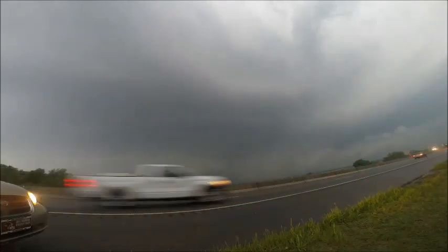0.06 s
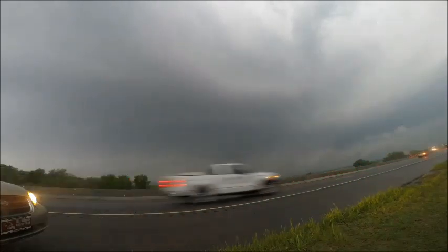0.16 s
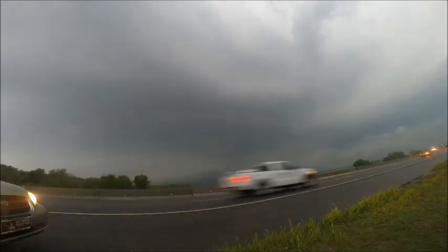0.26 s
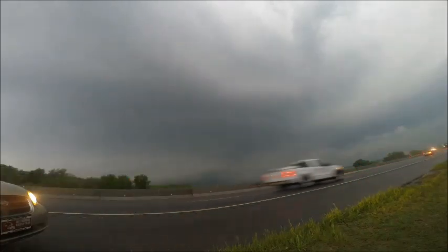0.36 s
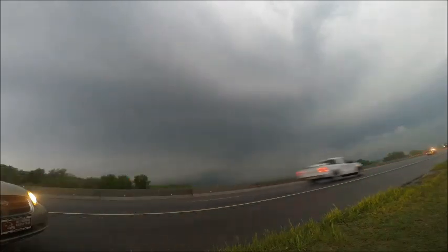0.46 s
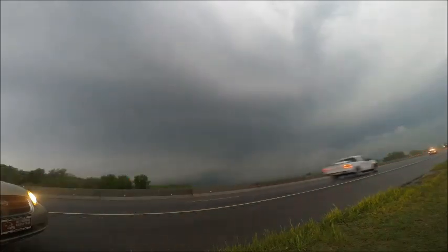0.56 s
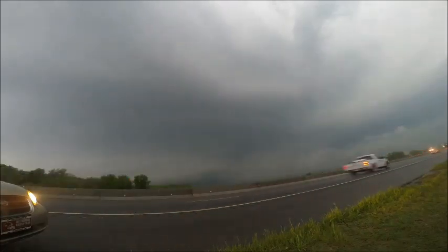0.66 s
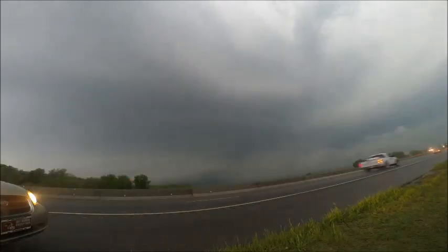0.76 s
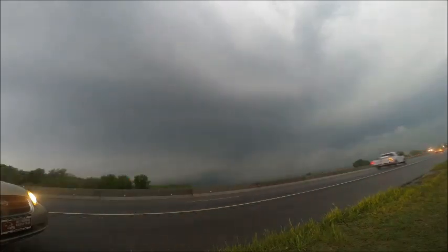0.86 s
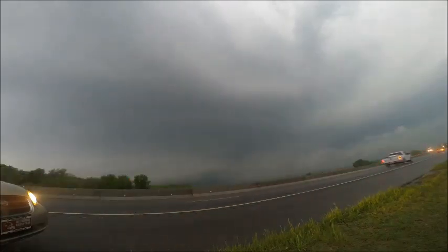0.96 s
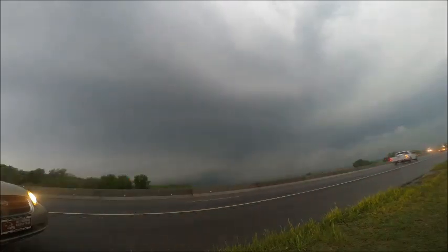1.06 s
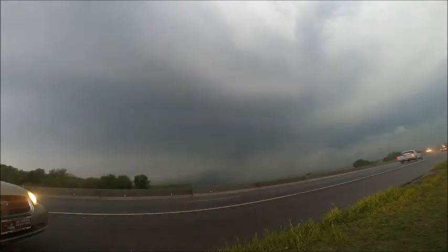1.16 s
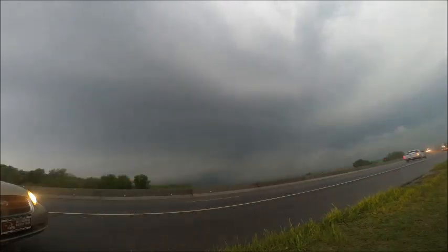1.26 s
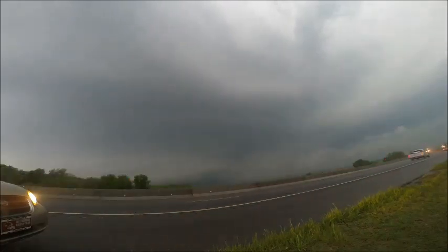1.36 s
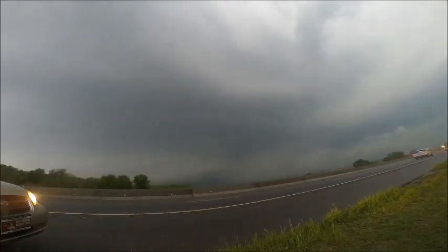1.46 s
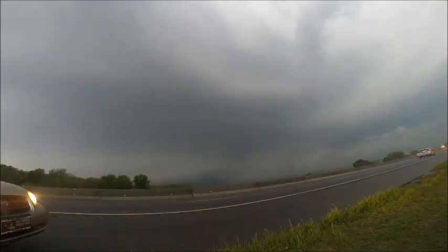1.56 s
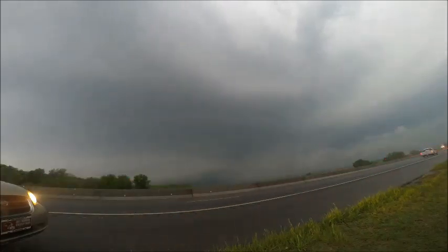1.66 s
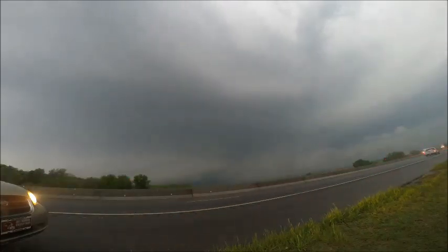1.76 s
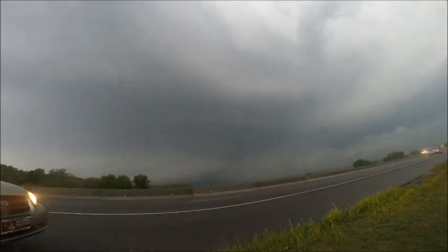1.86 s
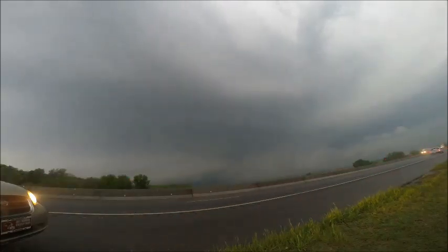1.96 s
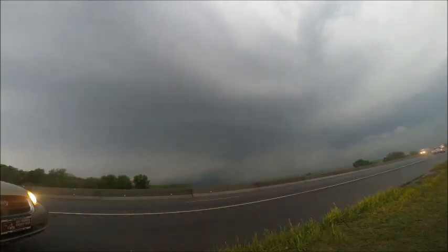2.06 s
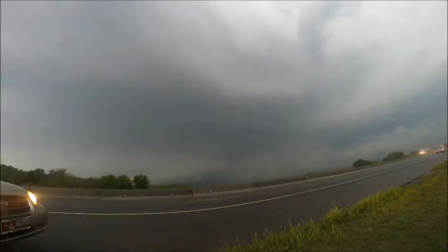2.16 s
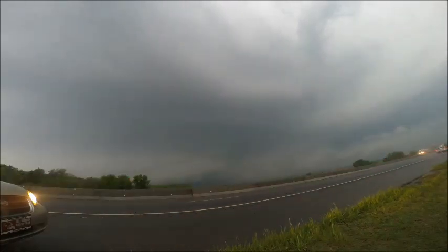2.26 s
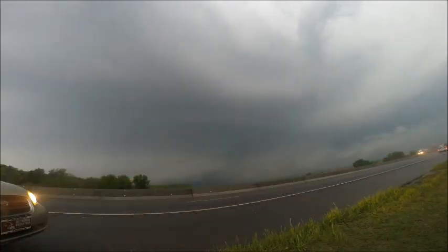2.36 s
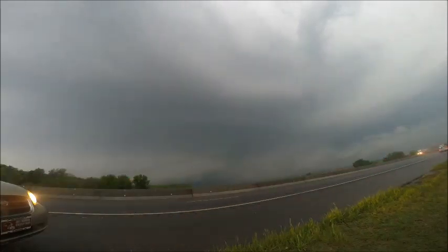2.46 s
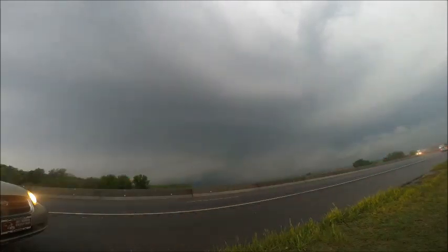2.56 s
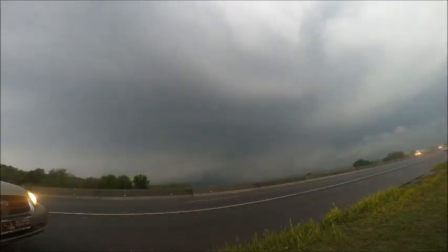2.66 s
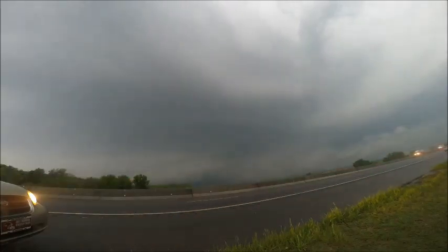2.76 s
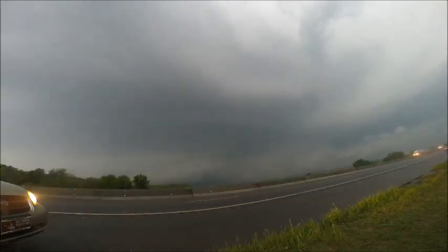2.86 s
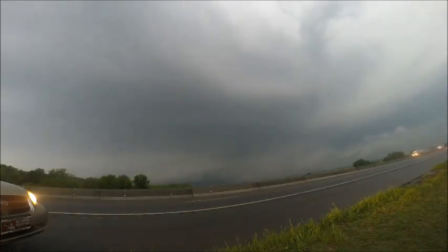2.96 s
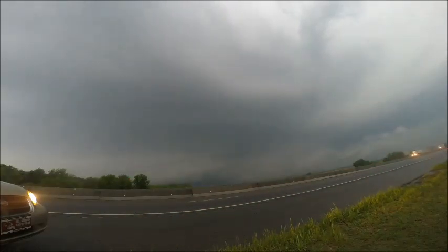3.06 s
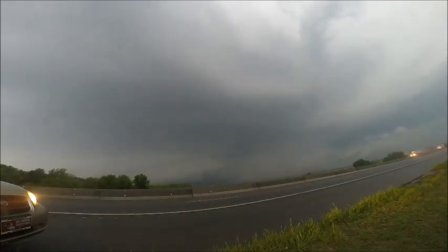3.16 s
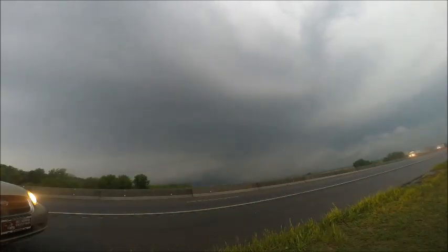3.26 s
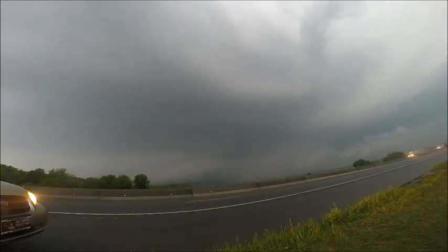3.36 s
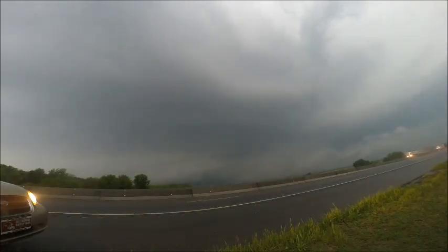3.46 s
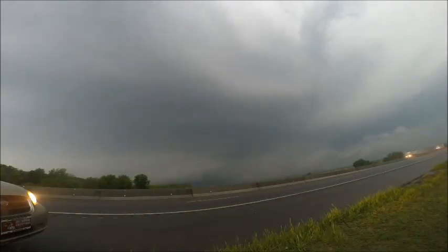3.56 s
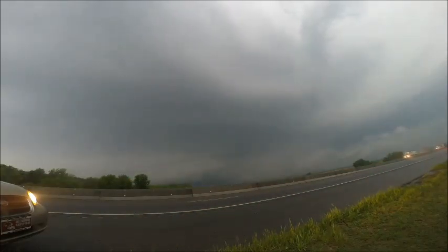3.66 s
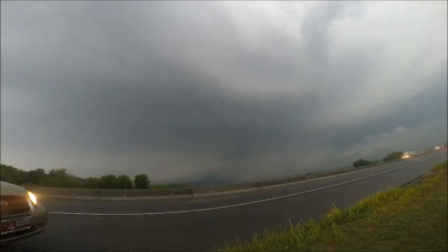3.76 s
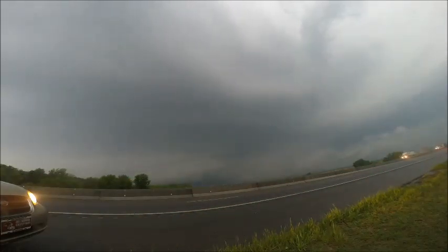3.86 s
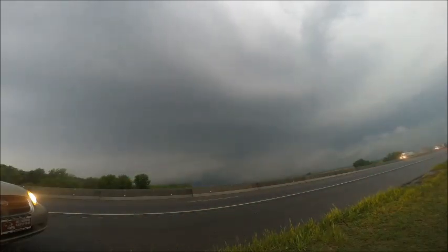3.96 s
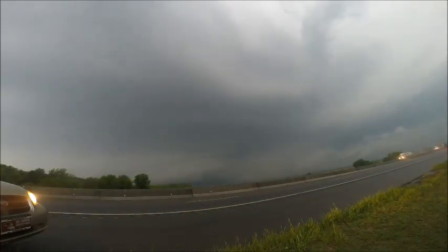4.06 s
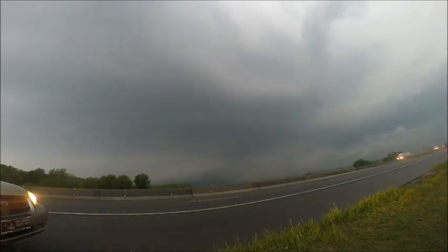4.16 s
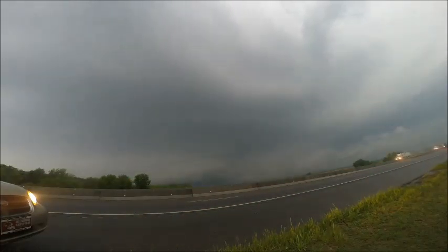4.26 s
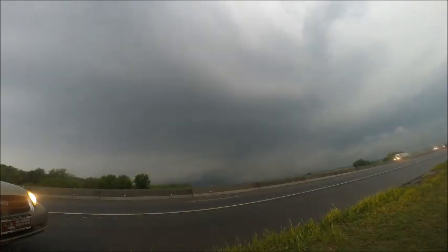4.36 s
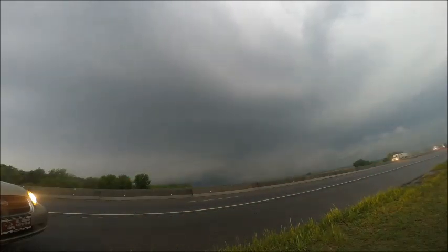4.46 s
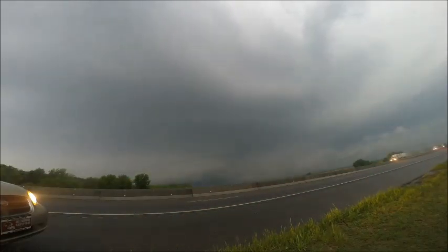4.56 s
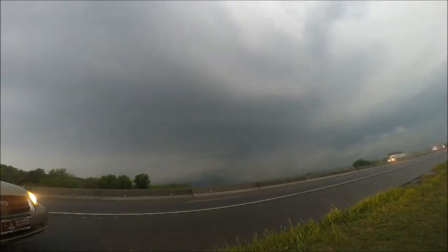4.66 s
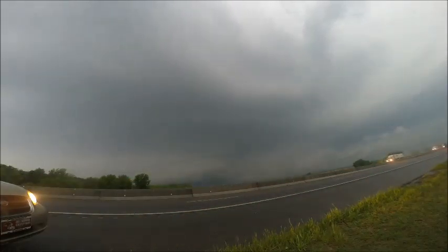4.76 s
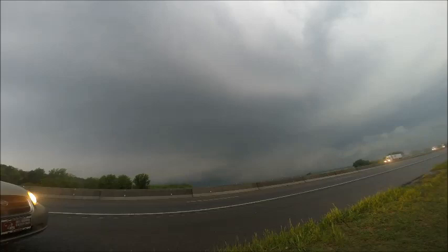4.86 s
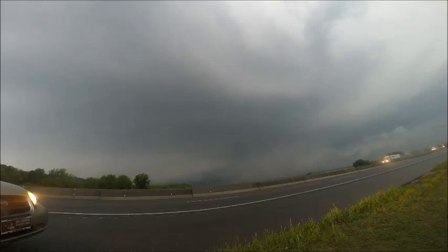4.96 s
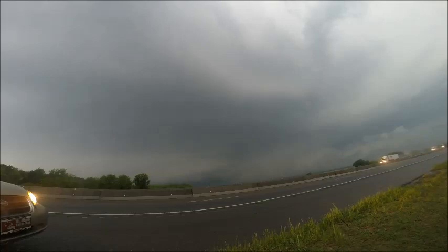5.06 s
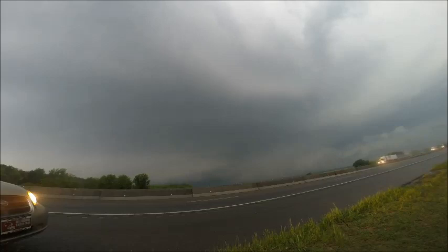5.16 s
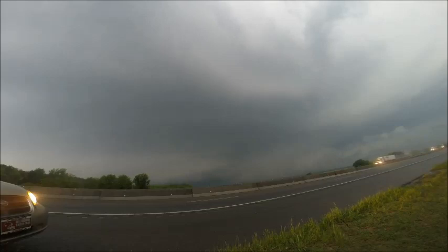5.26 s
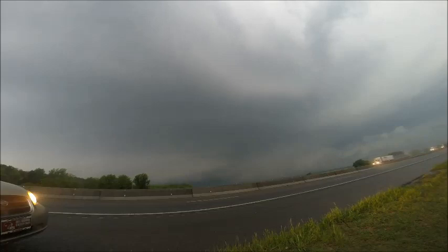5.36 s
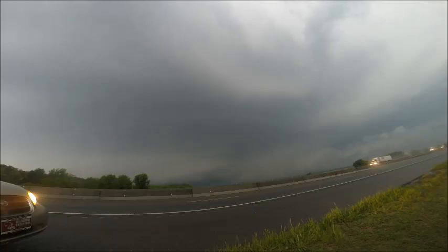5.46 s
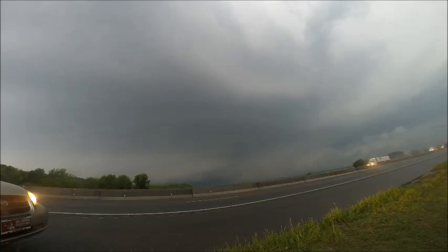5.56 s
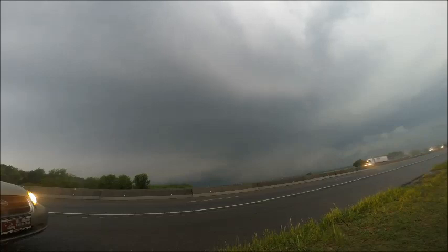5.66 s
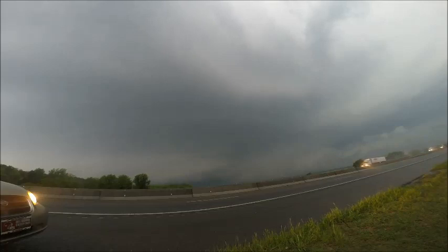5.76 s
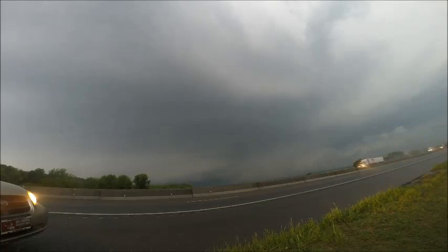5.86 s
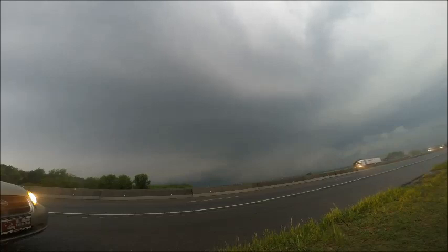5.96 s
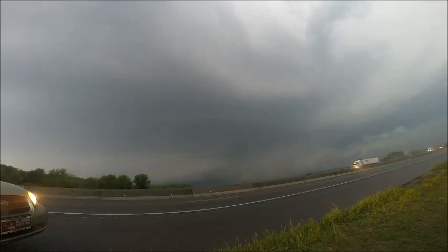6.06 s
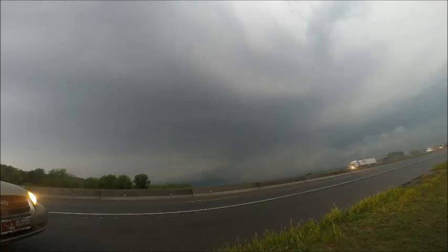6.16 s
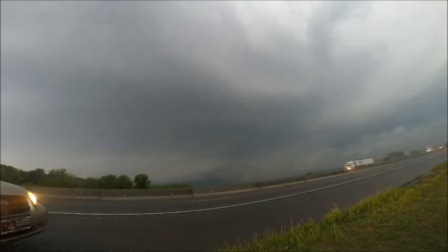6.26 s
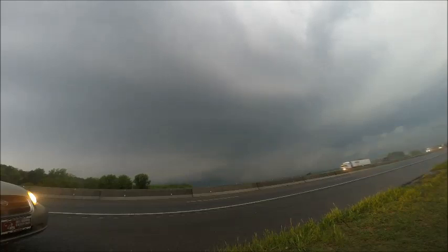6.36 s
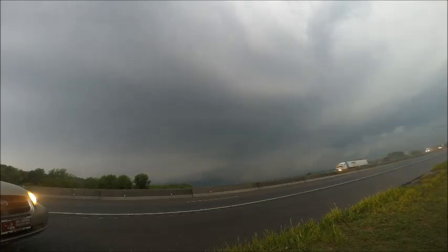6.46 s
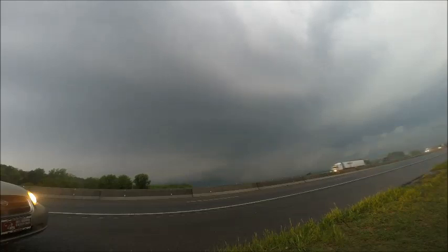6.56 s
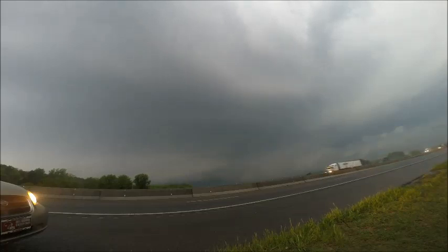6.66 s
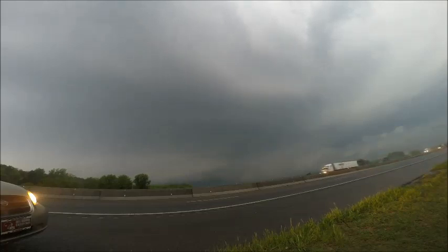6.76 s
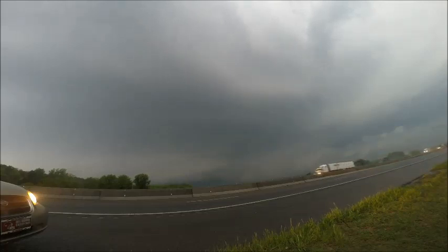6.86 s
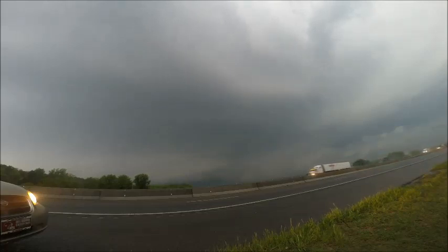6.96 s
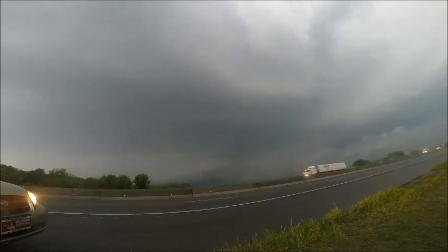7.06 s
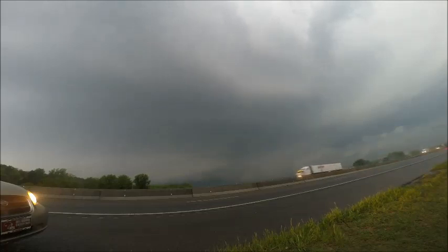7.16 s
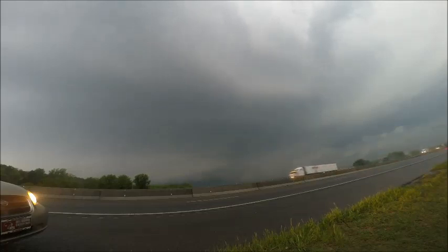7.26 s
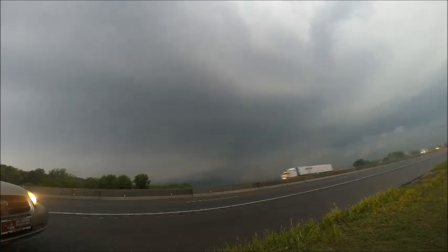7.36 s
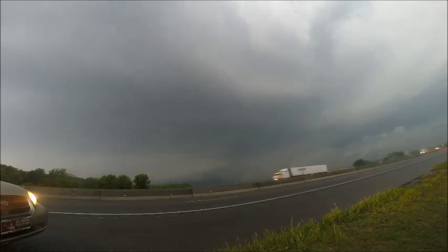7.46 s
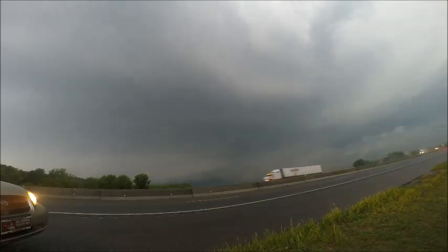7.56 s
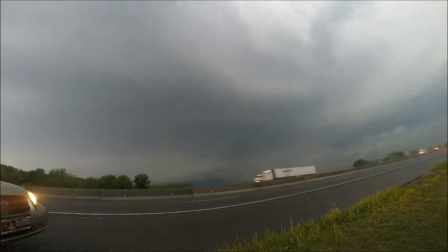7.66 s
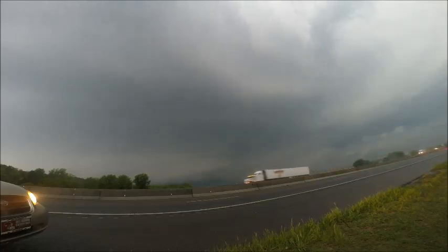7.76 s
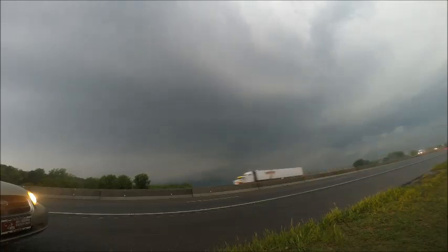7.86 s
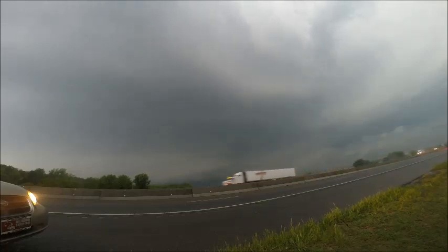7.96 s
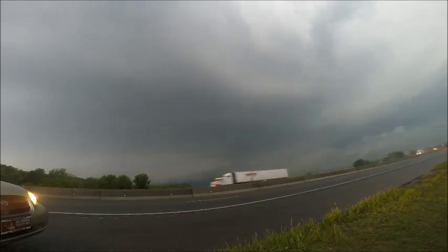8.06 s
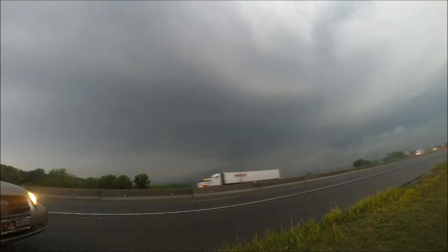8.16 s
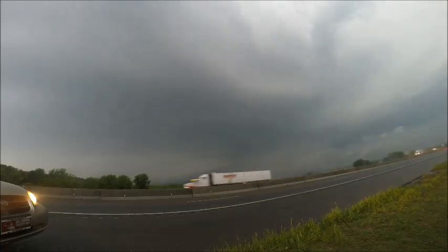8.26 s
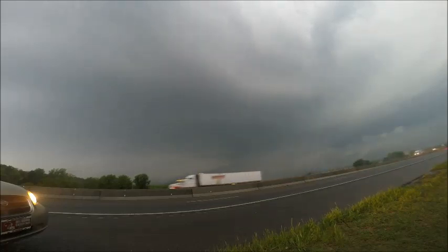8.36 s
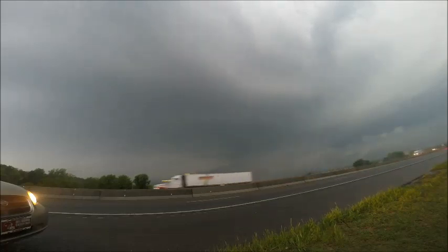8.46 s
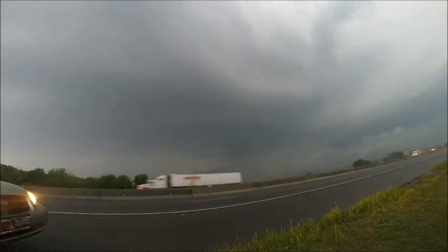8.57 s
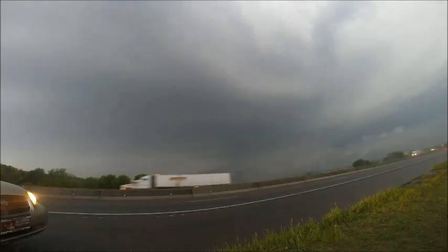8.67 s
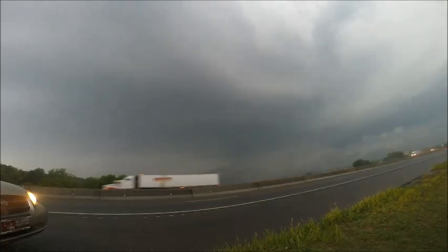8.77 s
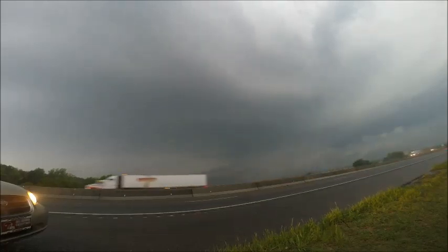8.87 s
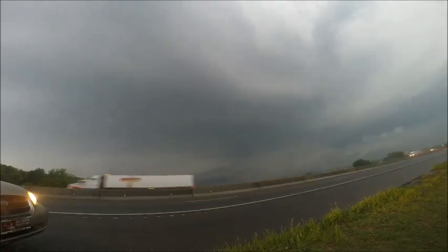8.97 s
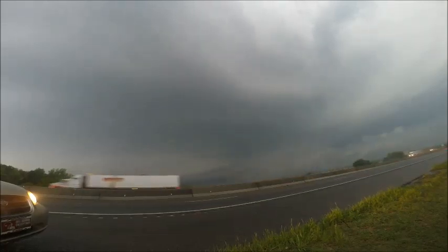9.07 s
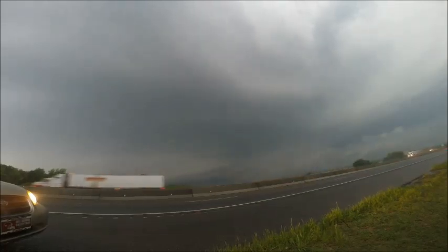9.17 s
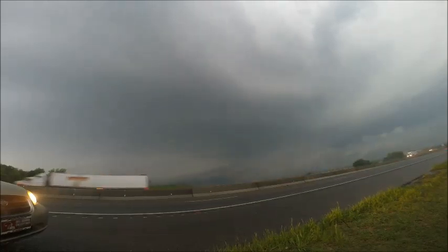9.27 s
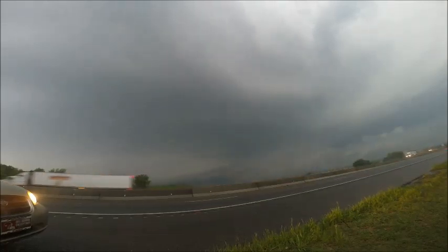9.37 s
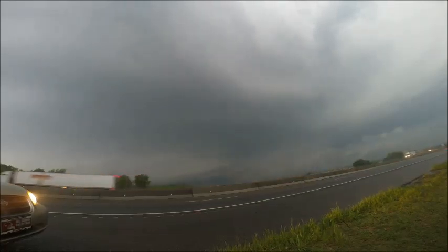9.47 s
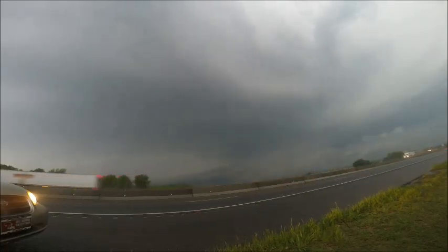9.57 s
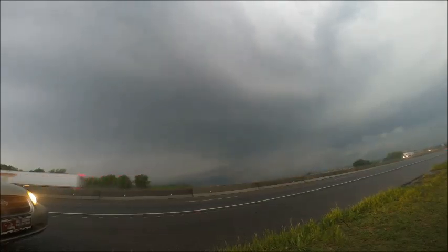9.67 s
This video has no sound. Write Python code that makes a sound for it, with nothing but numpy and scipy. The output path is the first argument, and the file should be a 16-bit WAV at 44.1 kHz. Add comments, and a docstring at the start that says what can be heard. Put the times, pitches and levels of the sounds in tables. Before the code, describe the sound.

Low wind buffeting runs under the sound of a highway, heard through a microphone in a plastic case. A pickup whooshes by at the start and fades into far traffic, with the faint high whirr of an idling car. A lorry's tyres whine softly for a couple of seconds. Toward the end the gusts strengthen and scattered raindrops knock on the case, finishing with one loud, sharp hit.

```python
"""A highway verge ahead of a storm, on the microphone of a camera in a plastic housing.
At once a pickup rushes past about 9 m away and recedes, leaving the tyre roar of far traffic and the
whirr of a parked car idling. Wind shakes the camera on its mount throughout. From 5 to 7 s a lorry
nears on the far side with a short tyre whine. Then the wind rises and hard taps, likely the first
raindrops, gather on the housing; the loudest, near 9 s, ducks the gain."""
import sys
import numpy as np
from scipy import signal
from scipy.fft import rfft, irfft, next_fast_len
from scipy.io import wavfile
from scipy.ndimage import uniform_filter1d

SR = 44100
rng = np.random.default_rng(int(sys.argv[2]) if len(sys.argv) > 2 else 0)


def generate_wav(signal):
    """Clip the signal to [-1, 1] and save it as 16-bit WAV at the path in sys.argv[1]."""
    frames = np.transpose(np.atleast_2d(signal))
    scaled = np.clip(frames, -1, 1) * 32767
    pcm = np.round(scaled).astype(np.int16)
    wavfile.write(sys.argv[1], SR, pcm)


N = 429093
TIME = np.arange(N) / SR
CUTOFF_HZ = 15100   # top of the camera's range


def pickup(peak_db, loudest_m, width_lanes, falloff):
    """Power of one part of the pickup's tyre noise as its beam sweeps the verge; falloff 1 is spherical."""
    abreast_s, speed_m_per_s, lane_m, flutter_hz = 0.1594, 33.88, 8.71, 7.1
    along_m = speed_m_per_s * (TIME - abreast_s) - loudest_m
    spreading = (1 + (along_m / (width_lanes * lane_m)) ** 2) ** falloff
    screened_db = 2.5 * np.exp(-TIME / 0.073)   # it comes clear of the parked car
    flutter_db = noise([(flutter_hz / 2, 0), (flutter_hz, 0), (2 * flutter_hz, -14)])   # turbulent wake
    return from_db(peak_db - screened_db + flutter_db) ** 2 / spreading


# Distant vehicles: loudest t/s, half-length/s, relative level/dB of roar, of tread, of hiss
FAR_PASSES = [(1.22, 0.305, -53.5, -55.5, -59.5), (1.95, 0.504, -54.5, -54.5, -63.5),
              (2.949, 0.516, -50.5, -53.5, -82), (4.702, 0.32, -60.5, -55, -87),
              (5.495, 0.8, -61.5, -50.5, -69.5), (6.604, 0.35, -58.5, -53.5, -60.5),
              (9.455, 0.12, -72.5, -58, -70)]
def far_traffic():
    """Power of roar, tread and hiss far down the road: vehicles swell out of a steady stream."""
    powers = []
    for part, stream_db in enumerate((-58, -57.5, -65)):
        passes = sum(swell(s, half_s, parts_db[part]) for s, half_s, *parts_db in FAR_PASSES)
        powers.append(from_db(stream_db) ** 2 + passes)
    return powers


# Spectra of the three parts of tyre noise: f/Hz, level/dB
ROAR_SPECTRUM = [(150, -9.5), (300, -13), (450, -9.5), (620, -2), (800, -4), (1100, -.5), (1500, -11),
                 (2500, -33)]
TREAD_SPECTRUM = [(700, -15), (1100, -2), (1400, 1), (1800, 0), (2300, -5.5), (2900, -12.5), (3600, -19.5),
                  (5000, -41)]
HISS_SPECTRUM = [(2200, -1), (3400, -1), (4500, -1), (6000, 0.5), (7500, -9.5), (10000, -14.5),
                 (12000, -24), (15000, -31)]
def tyres():
    """Near and far, tyres roar low, their tread sings, and air squeezed from the grooves hisses."""
    near_roar = pickup(peak_db=-36, loudest_m=-1.69, width_lanes=0.7563, falloff=1.01)
    near_tread = pickup(peak_db=-38, loudest_m=8, width_lanes=1.4045, falloff=0.74)
    near_hiss = pickup(peak_db=-40.5, loudest_m=6.5, width_lanes=3.0, falloff=5.5)
    far_roar, far_tread, far_hiss = far_traffic()
    roar = from_db(-2.0) * np.sqrt(near_roar + far_roar) * noise(ROAR_SPECTRUM)
    tread = from_db(-3.5) * np.sqrt(near_tread + far_tread) * noise(TREAD_SPECTRUM)
    hiss = from_db(-1.49) * np.sqrt(near_hiss + far_hiss) * noise(HISS_SPECTRUM)
    return roar + tread + hiss


# The pickup as seen from the microphone: t/s, bearing (0 abreast, 1 oblique, 2 receding, 3 far)
PICKUP_BEARING = [(.24, 0), (.38, 0.5), (.5, 1.5), (.66, 1.5), (.9, 3), (1.25, 3)]
# Colour of the reflections at each bearing: f/Hz, width/Hz, level/dB
ABREAST_BANDS = [(232, 226, 6), (832, 236, 4), (1076, 212, -3.5), (1790, 174, -8.5), (1973, 132, 10),
                 (2262, 270, -9.5), (2767, 530, 9.5), (3250, 260, -4.5), (4000, 420, -1.5),
                 (5340, 425, -8.5), (6144, 326, 9.5), (6520, 210, -10), (8200, 490, -8.5)]
OBLIQUE_BANDS = [(451, 185, 5), (780, 114, 5), (995, 132, 4.5), (1342.7, 44, 12), (1590, 240, 1.5),
                 (2130, 210, 2.5), (2900, 200, 1), (3300, 280, -5.5), (4735, 164, 6.5), (5040, 376, -5.5),
                 (5860, 250, 1.5), (7430, 860, 4)]
RECEDING_BANDS = [(755, 109, 7), (1340, 78, 1.5), (1700, 520, -3), (2280, 590, 6), (3320, 276, -10),
                  (3670, 67, -6.5), (5380, 630, 3), (6000, 220, -4), (13500, 2000, -3.5)]
FAR_BANDS = [(1072, 335, 0.5), (2800, 370, -6.5), (8380, 3900, -3.5)]
def reflections(x):
    """Reflections off road and housing glide from colour to colour as the pickup swings past."""
    bearing, = in_time(PICKUP_BEARING)
    out = np.zeros(N)
    for k, bands in enumerate((ABREAST_BANDS, OBLIQUE_BANDS, RECEDING_BANDS, FAR_BANDS)):
        share = np.maximum(1 - np.abs(bearing - k), 0)
        out += share * coloured(x, bands)
    return out


# Drops on the housing: t/s, tap level/dB, ring re tap/dB, thump level/dB, top f/Hz, bottom f/Hz
DROP_HITS = [(3.616, -45.5, -17, -47.5, 14200, 2500), (7.411, -36, -29.5, -87, 14000, 4500),
             (7.419, -33.5, -29.5, -87, 14000, 3300), (8.362, -22.5, -14, -31, 4510, 100),
             (8.4677, -23, -15, -25.5, 4500, 100), (8.4701, -21.5, -21, -20.5, 3200, 60),
             (8.635, -37.5, -27, -66.5, 12000, 2500), (8.9245, -3, 2.5, -11, 7200, 99)]
# Modes of the struck shell and of the mount under it: f/Hz, level/dB, t60/s
SHELL_MODES = [(615, -23, .03), (933, -21, 0.0526), (1103, -12.5, 0.053), (1176, -15.5, 0.092),
               (1532, -17.5, 0.043), (1844, -10, 0.1392), (1974, -1, 0.0226), (2270, -32, 0.0096),
               (3100, -25.5, 0.013), (4250, -33.5, 0.0092), (4820, -26, 0.02), (5754, -15.5, 0.018),
               (6550, -23.5, .01)]
MOUNT_MODES = [(58.25, -4, 0.814), (76.47, -3.5, 0.373), (169, -4.5, 0.0615)]
# Spectrum of the spatter: f/Hz, level/dB
SPLASH_SPECTRUM = [(150, -5.5), (350, 0), (700, -11.5), (1200, 5.5), (2100, 4.5), (2900, -1.5), (3600, -11),
                   (5700, -8.5), (7500, -39.5), (15000, -32.5)]
def raindrops(splash_db, splash_s, spray_db, spray_s):
    """Right by the microphone, a drop strikes the shell, spatters briefly and rocks the mount."""
    out, pushes = np.zeros(N), np.zeros(N)
    spatter = steadied(noise(SPLASH_SPECTRUM), seconds=0.0014)
    shell = ring(np.where(TIME == 0, 1, 0), SHELL_MODES)
    splash = from_db(splash_db) * np.exp(-(TIME / splash_s) ** 2)
    burst = splash + from_db(spray_db) * np.exp(-TIME / spray_s)
    for s, tap_db, ring_db, thump_db, top_hz, bottom_hz in DROP_HITS:
        at = int(s * SR)
        tap = from_db(ring_db) * shell[:N - at] + burst[:N - at] * spatter[at:]
        # a softer contact is duller, a smaller drop thinner
        band_hz = [bottom_hz, np.clip(top_hz, 2 * bottom_hz, CUTOFF_HZ)]
        contact = signal.butter(2, band_hz, "band", fs=SR, output="sos")
        out[at:] += from_db(tap_db) * signal.sosfilt(contact, tap + 1e-18)
        pushes[at] = from_db(thump_db)
    return out + ring(pushes, MOUNT_MODES)


# Spectra of wind pressure on the housing and of the shaking mount: f/Hz, level/dB
BUFFET_SPECTRUM = [(12, -11), (22, -0.5), (32, -1), (45, -12), (70, -16.5), (140, -32)]
MOUNT_SPECTRUM = [(35, -24.5), (50, -16.5), (58, 5.5), (67, -17.5), (79, -12), (89, -22.5), (101, -17.5),
                  (120, -35), (170, -36), (250, -41.5), (500, -55.5)]
# Strength of that pressure and of the shaking between gusts: t/s, relative level/dB
BUFFET_LEVELS = [(0.0, -45), (0.43, -45), (6.68, -45.5), (6.92, -40.5), (9.52, -40), (9.6, -39.5)]
SHAKE_LEVELS = [(0.0, -47), (4.23, -40), (4.4, -53.5), (7.42, -44.5), (7.46, -33.5), (7.98, -39.5),
                (8.4, -36.5)]
# Gusts that jolt the mount: strongest t/s, half-length/s, level/dB
GUST_PEAKS = [(0.861, 0.0496, -34), (1.935, 0.0535, -37), (2.481, 0.0566, -35), (3.263, 0.068, -39),
              (8.73, 0.0298, -27.5), (9.03, 0.061, -26.5), (9.267, 0.093, -24), (9.55, 0.164, -33)]
def wind(jolt_below_hz):
    """Eddies press on the housing and shake the mount; slow gusts reach only its lowest resonances."""
    buffet_db, = in_time(BUFFET_LEVELS)
    shake_db, = in_time(SHAKE_LEVELS)
    gusts = np.sqrt(sum(swell(s, half_s, db) for s, half_s, db in GUST_PEAKS))
    buffet = from_db(buffet_db + 2.08) * steadied(noise(BUFFET_SPECTRUM), seconds=0.197)
    shake = from_db(shake_db - 0.49) * steadied(noise(MOUNT_SPECTRUM), seconds=0.14)
    lowpass = signal.butter(2, jolt_below_hz, fs=SR, output="sos")
    jolts = signal.sosfilt(lowpass, noise(MOUNT_SPECTRUM))
    return buffet + shake + gusts * steadied(jolts, seconds=0.14)


# The lorry's tyre note, from the far side of the road: t/s, f/Hz, level/dB
LORRY_NOTE = [(4.9, 593, -89.5), (5.2, 588.9, -67.5), (5.6, 592.4, -63), (6.0, 588, -59),
              (6.35, 589.2, -61), (6.5, 563.8, -72), (6.8, 574, -63.5), (7.3, 560, -87)]
def lorry_whine(waver_hz, undertone_db):
    """Regular tread blocks give a slightly unsteady note, with a weaker one a fifth below."""
    hz, db = in_time(LORRY_NOTE)
    waver = waver_hz * noise([(3, 11), (25, -9.5)])
    phase = 2 * np.pi * np.cumsum(hz + waver) / SR
    undertone = from_db(undertone_db) * np.sin(phase * 2 / 3)
    return from_db(db) * np.sqrt(2) * (np.sin(phase) + undertone)


# Spectrum of the distant road's rumble: f/Hz, level/dB
RUMBLE_SPECTRUM = [(40, -4), (100, 1.5), (170, -1), (250, -4.5), (400, -9.5), (800, -16)]
def far_rumble():
    """Distant traffic lays a steady low rumble over the verge."""
    return from_db(-51.5) * noise(RUMBLE_SPECTRUM)


# Spectrum of the parked car's whirr: f/Hz, level/dB
IDLE_SPECTRUM = [(1500, -27), (2400, -13), (2850, 3), (3050, -9), (3500, -3.5), (4200, -19), (6000, -33)]
def parked_car():
    """The idling engine gives a faint, high whirr."""
    return from_db(-66.5) * noise(IDLE_SPECTRUM)


# The camera's whistles and the spectrum of its hiss: f/Hz, level/dB
WHISTLES = [(8781, -87.5), (11688, -92.5), (11719, -81.5), (14626, -83.5)]
CIRCUIT_SPECTRUM = [(1000, -4), (7000, 3), (11000, -2.5), (12500, -2), (15000, -15.5)]
def circuit(hiss_db):
    """The electronics behind the microphone add faint hiss and thin whistles."""
    tones = sum(from_db(db) * np.sqrt(2) * np.sin(2 * np.pi * hz * TIME) for hz, db in WHISTLES)
    return tones + from_db(hiss_db) * noise(CIRCUIT_SPECTRUM)


# Peaks and hollows of the plastic housing: f/Hz, width/Hz, level/dB
HOUSING_BANDS = [(759, 149, 4), (1186, 37, 4), (1474.4, 123.3, 9), (1797.7, 80, 5.5), (1998, 220, -8),
                 (2281.4, 179, 9.5), (2689, 196, 6), (3076, 160, 9), (3428, 462, -3.5), (3993, 160, 3.5),
                 (4932, 670, 7), (5720, 265, 2.5), (6083, 232, -6.5), (6740, 300, 3)]
def housing(x):
    """The shell colours outside sound on its way to the microphone."""
    return coloured(x, HOUSING_BANDS)


def gain_control(x, threshold_db, release_db_per_s, attack_s):
    """A loud peak pulls the camera's gain down quickly; it then creeps back."""
    over_db = np.maximum(20 * np.log10(np.abs(x) + 1e-9) - threshold_db, 0)
    release_db = release_db_per_s * TIME
    held_db = np.maximum.accumulate(over_db + release_db) - release_db
    pole = np.exp(-1 / (attack_s * SR))
    return x * from_db(-signal.lfilter([1 - pole], [1, -pole], held_db))


def from_db(db):
    """Decibels to gain."""
    return 10 ** (np.asarray(db) / 20)


def in_time(table):
    """Each column after the time column, at every sample."""
    s, *columns = np.transpose(table)
    return [np.interp(TIME, s, column) for column in columns]


def swell(at_s, half_s, db):
    """Power of a sound that rises smoothly to a peak and sinks again."""
    return from_db(db) ** 2 * np.exp(-np.minimum(((TIME - at_s) / half_s) ** 2, 60))


def noise(spectrum):
    """Unit-rms noise with the given spectral density (f/Hz, level/dB), rolling off outside it."""
    hz, db = np.transpose(spectrum)
    size = next_fast_len(N)
    bins = np.fft.rfftfreq(size, 1 / SR) + 1e-3
    skirts = 1 / (1 + (hz[0] / 2 / bins) ** 2) / (1 + (bins / hz[-1] / 2) ** 2)
    gain = from_db(np.interp(np.log(bins), np.log(hz), db)) * skirts
    x = irfft(rfft(rng.standard_normal(size)) * gain, size)[:N]
    return x / np.sqrt(np.mean(x ** 2) + 1e-20)


def steadied(x, seconds):
    """Take the slow swells out of a noise, leaving its quick lumps."""
    return x / np.sqrt(uniform_filter1d(x * x, max(int(seconds * SR), 2)) + 1e-9)


def ring(clicks, modes):
    """Each click sets every mode ringing as a dying sine."""
    out = np.zeros(N)
    for hz, db, t60 in modes:
        r, w = from_db(-60 / (t60 * SR)), 2 * np.pi * hz / SR
        out += from_db(db) * signal.lfilter([0, np.sin(w)], [1, -2 * r * np.cos(w), r * r], clicks + 1e-18)
    return out


def coloured(x, bands):
    """Lift some bands and hollow out others."""
    for hz, width_hz, db in bands:
        lift, damp = from_db(db / 2), np.pi * width_hz / SR
        c = -2 * np.cos(2 * np.pi * hz / SR)
        x = signal.lfilter([1 + damp * lift, c, 1 - damp * lift], [1 + damp / lift, c, 1 - damp / lift], x)
    return x


def scene():
    """Road sound comes through the housing; wind and drops act on it directly."""
    background = far_rumble() + parked_car()
    road = reflections(tyres()) + lorry_whine(waver_hz=3.1, undertone_db=-7) + background
    taps = raindrops(splash_db=-9.5, splash_s=0.00417, spray_db=-23.5, spray_s=0.012)
    return (housing(road) + wind(jolt_below_hz=166) + taps + circuit(hiss_db=-72.5))[None]


def record(dry):
    """The camera ducks its gain, rounds the peaks and cuts the top steeply."""
    held = gain_control(dry[0], threshold_db=-5, release_db_per_s=18, attack_s=0.0147)
    rounded = held / (1 + (held / .85) ** 4) ** (1 / 4)
    top_cut = signal.ellip(10, .1, 90, CUTOFF_HZ, fs=SR, output="sos")
    return signal.sosfilt(top_cut, rounded)[None]


dry = scene()
out = record(dry)
generate_wav(out)
```